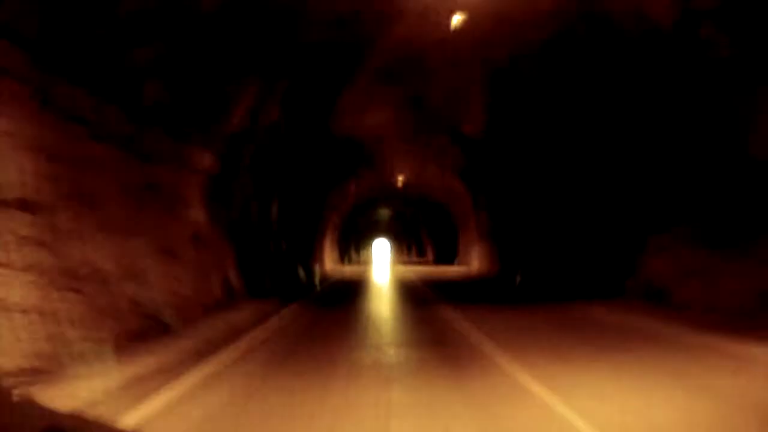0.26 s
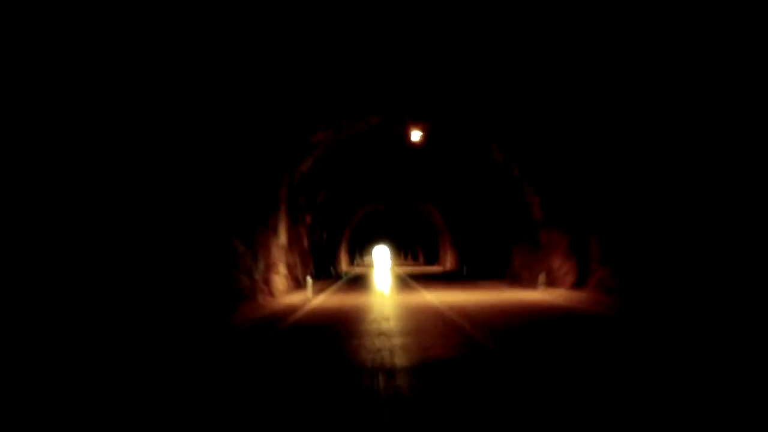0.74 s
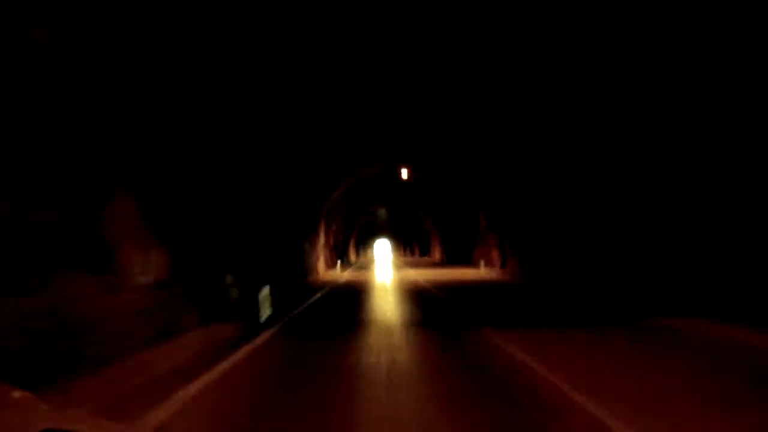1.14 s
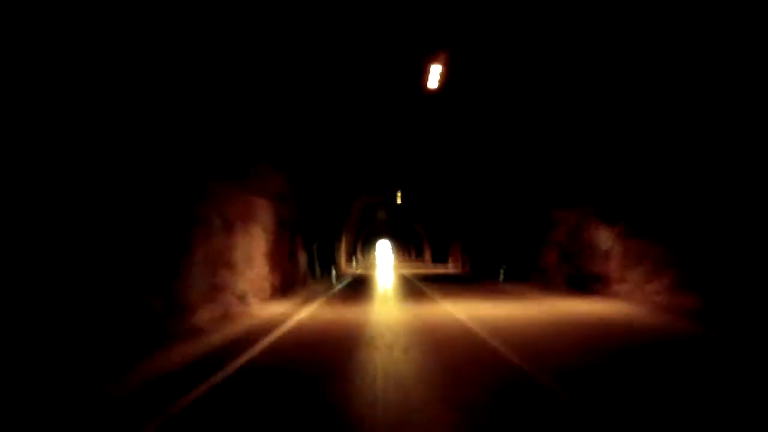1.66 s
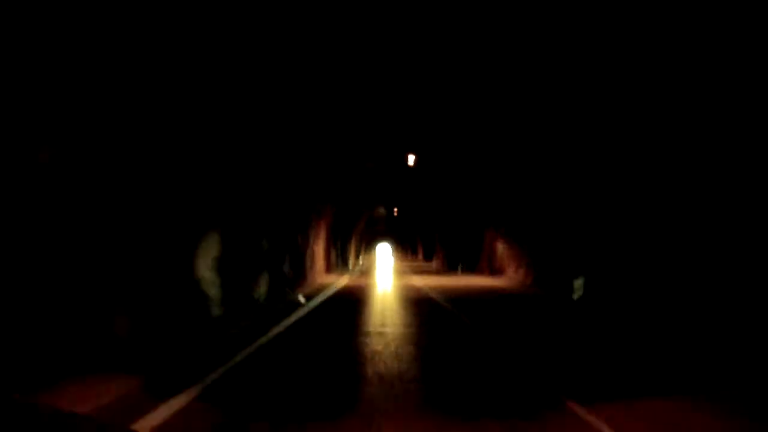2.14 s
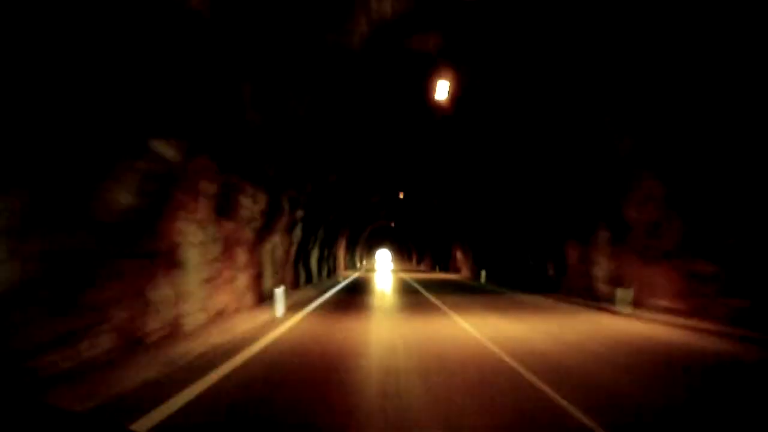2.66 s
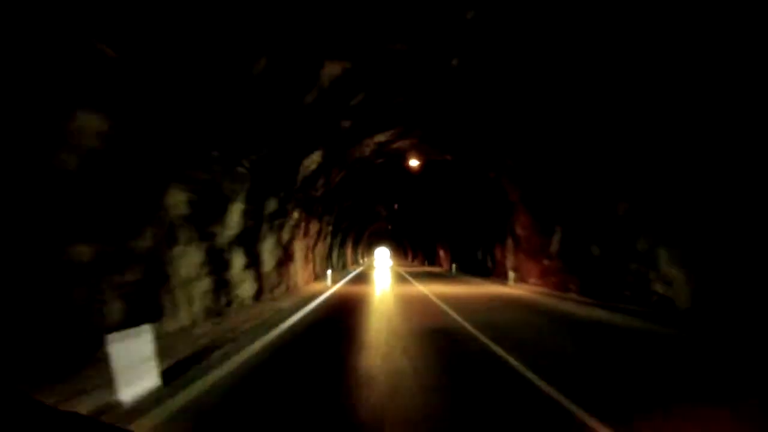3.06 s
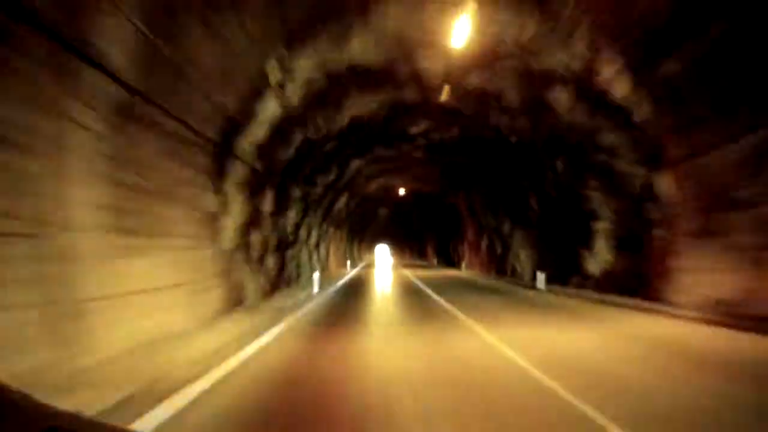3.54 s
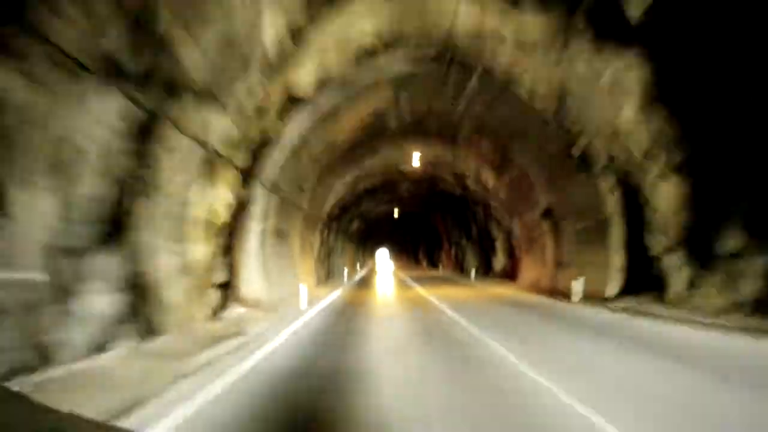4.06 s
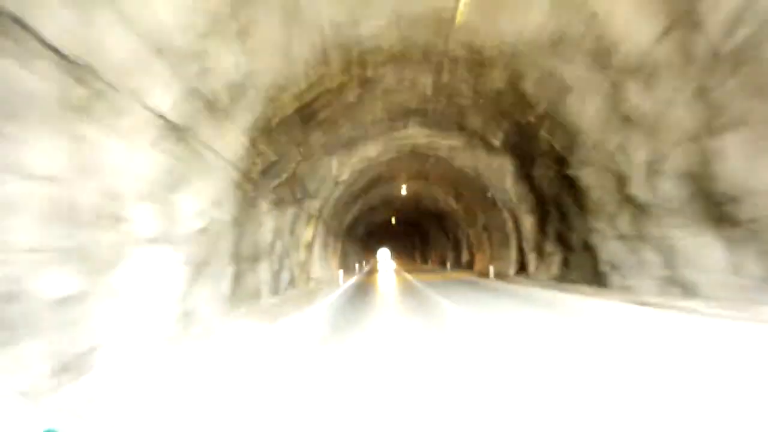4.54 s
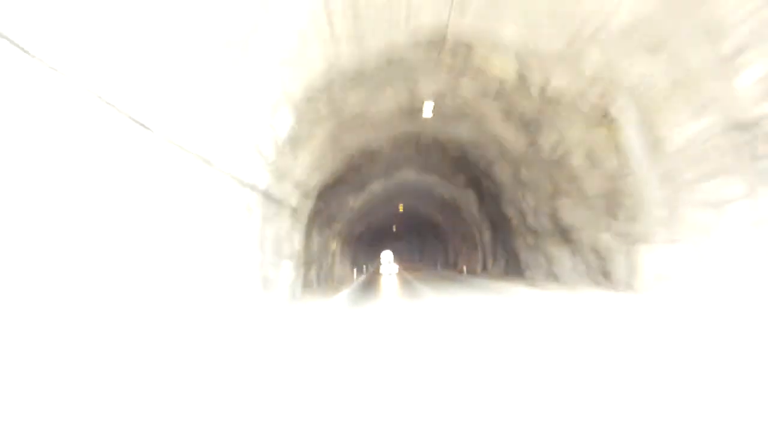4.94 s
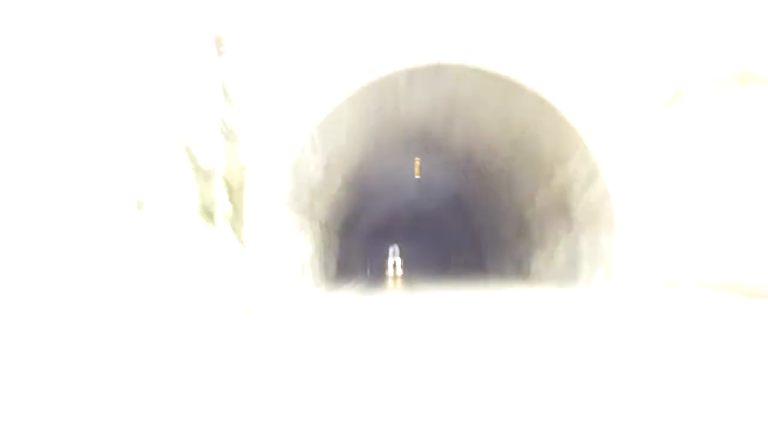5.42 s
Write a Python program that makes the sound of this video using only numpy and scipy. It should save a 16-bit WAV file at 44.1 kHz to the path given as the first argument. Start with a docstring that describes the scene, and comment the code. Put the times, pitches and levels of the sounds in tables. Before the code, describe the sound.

Steady engine hum and rough tyre noise in a tunnel drive, chirping camera mount, thumping jolts, engine pitch sagging before clattering at the end.

```python
"""An engine drones as a car drives through a rock tunnel: a firing tone, its half order and weak overtones,
with the pitch easing down near the exit. A small camera at the windscreen hears it under shaped-noise road rumble,
boom and tyre roar, with one swell of hiss; its mount squeaks in stick-slip chirps and rattles as ringing modes.
Bumps push the microphone and duck its limiter; a sample-and-hold adds a gritty treble."""
import sys
import numpy as np
from scipy import signal
from scipy.fft import rfft, irfft
from scipy.io import wavfile

SR = 44100
rng = np.random.default_rng(int(sys.argv[2]) if len(sys.argv) > 2 else 0)


def dump(signal):
    """Clip the signal to [-1, 1] and save it as 16-bit WAV at the path in sys.argv[1]."""
    limited = np.clip(np.atleast_2d(signal).T, -1, 1)
    pcm = np.round(limited * 32767).astype(np.int16)
    wavfile.write(sys.argv[1], SR, pcm)


N = 250929
TIME_S = np.arange(N) / SR

# Road roughness heard in the cabin: (time [s], boom before trim [dB], tyre roar before trim [dB])
ROAD_LEVELS = [(0, -25, -40.5), (0.4, -27, -34), (0.52, -29, -43.5), (0.8, -27.5, -37),
               (1.12, -24.5, -37.5), (1.24, -29, -41.5), (1.8, -20.5, -35.5), (2.4, -25, -39),
               (2.64, -31.5, -45.5), (2.8, -23.5, -36.5), (3.17, -28.5, -42), (3.7, -26.5, -38.5),
               (4.1, -27.5, -41), (4.25, -30, -42), (4.9, -23.5, -38.5), (5.25, -28, -43.5),
               (5.5, -26.5, -39), (5.69, -28.5, -41)]
# Body rumble before bobbing and lumps: (time [s], level [dB])
RUMBLE_LEVELS = [(0, -22.5), (0.7, -17.5), (1.7, -18.5), (2.4, -17), (2.68, -23.5), (3.1, -18),
                 (4.0, -20.5), (4.75, -16.5), (5.15, -23), (5.69, -23)]
# Noise spectra, rescaled to rms 1: (frequency [Hz], relative density [dB per Hz])
RUMBLE_SPECTRUM = [(10, -39), (22, -10.5), (44, 2.5), (58, 2), (80, 1.5), (110, -1.5), (150, -2),
                   (200, -13.5), (320, -43)]
BOOM_SPECTRUM = [(90, -30), (160, 0), (240, -0.5), (320, -5), (480, -6.5), (600, -10.5), (720, -15),
                 (860, -26.5), (1300, -66)]
ROAR_SPECTRUM = [(400, 0.5), (800, 2), (1020, 5), (1250, 4.5), (1450, 1.5), (1750, 3), (2200, 4.5),
                 (2600, 0), (2900, 6), (3250, -1.5), (4200, -9.5), (4700, -9), (5300, -14.5), (6000, -18)]
HISS_SPECTRUM = [(2500, -20), (3800, -3), (4600, 3), (5400, -9), (6000, -12)]
# Tyre hiss as the rock opens to daylight: (centre time [s], Gaussian half-width to 1/e [s], peak level [dB])
HISS_SWELL = (4.68, 0.11, -48)
# Road bumps: (nominal time [s], jolt [dB], pressure dip before it [dB])
BUMPS = [(0.435, -1.5, -9), (0.929, 7, -10), (1.137, 2, -2), (1.204, -4, 2.5), (1.808, -1, -23),
         (1.997, 2.5, -8.5), (2.148, -0.5, -15), (2.328, 0, -25), (2.522, -5, -8.5), (2.834, 15, -5.5),
         (3.395, 7, 2), (3.789, 8.5, -6), (4.104, 0, -16), (4.937, 14.5, -3), (5.239, 8, 5.5)]
# Mount rocking: (nominal time [s], forward squeak [dB], return squeak before trim [dB])
MOUNT_ROCKS = [(0.1485, -19.5, -24), (0.25, -20, -29), (0.317, -22, -35), (0.3616, -12.5, -19.5),
               (0.706, -20, -42), (0.896, -24.5, -37), (0.9985, -24.5, -45), (1.1218, -18, -28),
               (1.43, -18, -32), (1.644, -22, -37), (1.7436, -16.5, -32), (2.137, -14, -28),
               (2.188, -20, -22), (2.444, -20.5, -33), (2.692, -20, -28.5), (3.0496, -30, -52),
               (3.454, -18, -31), (3.4999, -16, -34), (3.551, -21, -32), (3.9173, -24, -32.5),
               (3.9742, -17.5, -28.5), (4.023, -17, -36), (4.0764, -25, -36), (4.4913, -23.5, -52),
               (4.793, -27.5, -41), (4.8824, -14.5, -32), (5.083, -26.5, -48), (5.3765, -15.5, -36),
               (5.46, -19, -34), (5.508, -15, -37)]
# Mount slipping back on its own: (nominal time [s], squeak before trim [dB])
BACK_SLIPS = [(0.6394, -22.5), (0.7767, -27.5), (1.0537, -30), (1.183, -29.5), (1.713, -25.5),
              (2.1066, -29.5), (2.3527, -25), (2.5217, -25.5), (3.3228, -33.5), (3.4244, -29),
              (4.1616, -34.5), (4.6364, -28), (5.315, -26.5), (5.4365, -27)]
# Mount knocks, and at 0.9244 s the crackle of a bump overloading the microphone input:
# (nominal time [s], clack peak [dB], thud before trim [dB re clack], snap before trim [dB re clack])
RATTLES = [(0.3877, -15, -2, -19), (0.409, -16, 5.5, -24), (0.9244, -22, 7.5, -7), (1.119, -16, 4.5, -29),
           (1.132, -22.5, 16, -25), (3.5234, -18, -3, -22), (3.9996, -17, -4, -24), (4.0483, -17, -1, -11),
           (4.3991, -21, 8, -5), (4.8143, -18, 1, -18), (4.9089, -14.5, 4, -27), (5.402, -12.5, -3, -31),
           (5.435, -11.5, -17, -25), (5.4575, -18, -11, -20), (5.463, -16.5, 0, -1.5),
           (5.482, -2.5, 2.5, -11), (5.5071, -9.5, 0, -10), (5.5307, -13, 0, -28), (5.5371, -17, 1, -27),
           (5.6332, -13.5, -3, -33), (5.6388, -19, 5.5, -28)]
# Modes of the mount's plastic: (frequency [Hz], level [dB], t60 [s])
PLASTIC_MODES = [(967, 7.5, 0.034), (1144, 5.5, 0.021), (1736, 7, 0.014), (2180, 7.5, 0.012),
                 (2476, 4, 0.029), (3016, 10, 0.0071), (3870, 0.5, 0.024), (4820, -8.5, 0.01)]
# Modes of its hollow body: (frequency [Hz], level [dB], t60 [s])
BODY_MODES = [(450, -8, 0.024), (648, 4, 0.0062), (744, -3, 0.016)]
# Engine, before jitter and waver: (time [s], firing rate [Hz], firing tone [dB], half order before trim [dB])
ENGINE = [(0, 126.8, -23.5, -22.5), (.4, 126.1, -20, -22), (1.15, 124.3, -30, -23.5),
          (1.6, 121.5, -23.5, -30.5), (2.85, 123, -22, -20.5), (3.3, 123, -28, -21),
          (3.9, 122.1, -19.5, -27), (4.3, 118, -21, -28), (5.15, 108.7, -19.5, -31.5),
          (5.69, 103.3, -16.5, -15)]
# Engine overtones: (multiple of firing rate [-], level [dB re firing tone])
OVERTONES = [(1.5, -29), (2, -14), (3, -24.5), (4, -26.5)]

# The car bobs on its springs
BOB_HZ, BOB_CREST_S = 4.4, 0.22
# Return slip: delay after the forward slip, mean pitch, rms pitch spread as a fraction
RETURN_DELAY_S, RETURN_HZ, RETURN_SPREAD = 0.0235, 3690, 0.028
HOLD_HZ, EDGE_HZ = 12000, 15500  # sample-and-hold rate, final low-pass


def amp(db):
    """Decibels to gain."""
    return 10 ** (np.asarray(db) / 20)


def unit(x):
    """Scale to rms 1."""
    return x / np.sqrt(np.mean(x ** 2) + 1e-20)


def curves(rows):
    """Each column after time as a curve over TIME_S."""
    time_s, *columns = np.transpose(rows)
    return [np.interp(TIME_S, time_s, column) for column in columns]


def add(mix, start_s, sound):
    """Add a sound into the mix in place, cut at the end."""
    part = mix[max(round(start_s * SR), 0):][:len(sound)]
    part += sound[:len(part)]


def noise(spectrum):
    """Noise of rms 1 with the given spectrum, rolled off above its last point."""
    f_hz = np.fft.rfftfreq(N, 1 / SR) + 1  # +1 avoids log(0)
    hz, db = np.transpose(spectrum)
    rolloff = np.maximum(f_hz / hz[-1], 1) ** 2
    shape = amp(np.interp(np.log(f_hz), np.log(hz), db)) / rolloff
    return unit(irfft(rfft(rng.standard_normal(N)) * shape, N))


def wander(rate_hz):
    """Slow random curve of rms 1, Gaussian-filtered to about the given rate."""
    f_hz = np.fft.rfftfreq(N, 1 / SR)
    return unit(irfft(rfft(rng.standard_normal(N)) * np.exp(-(f_hz / rate_hz) ** 2), N))


def lowpass(x, cutoff_hz):
    """Steep linear-phase low-pass."""
    return signal.oaconvolve(x, signal.firwin(301, cutoff_hz, fs=SR), "same")


def ring(modes):
    """Response of damped modes to one contact, alternate modes inverted."""
    t_s = np.arange(SR // 20) / SR
    response = np.zeros(len(t_s))
    for k, (hz, db, t60_s) in enumerate(modes):
        response += amp(db - 60 * t_s / t60_s) * np.sin(2 * np.pi * (hz * t_s + k / 2))
    return response


def squeak(hz, length_s, sag, rough_rad, scratch, octave_db=-21):
    """One stick-slip chirp: sharp swell, sagging pitch, phase random walk, faint octave and scrape noise."""
    u = np.linspace(0, 1, max(int(length_s * SR), 10))
    steps, scrape = rng.standard_normal((2, SR // 20))[:, :len(u)]
    angle = 2 * np.pi * np.cumsum(hz * (1 + sag * (.5 - u))) / SR
    angle += rough_rad * np.cumsum(steps) / np.sqrt(len(u))
    swell = np.sin(np.pi * u) * np.exp(-2 * abs(u - .5))
    edge = amp(octave_db) * np.sin(2 * angle) + scratch * scrape
    return swell * (np.sin(angle) + swell * edge)  # edge peaks more sharply than the tone


def hiss():
    """Tyre hiss swells smoothly as the rock opens."""
    centre_s, width_s, db = HISS_SWELL
    return amp(db) * np.exp(-((TIME_S - centre_s) / width_s) ** 2) * noise(HISS_SPECTRUM)


def road(shake_hz=37, shake_jitter=0.0915, shake_db=1.62, rumble_bob_db=0.5, boom_bob_db=0.6,
         lumps_db=1.5, boom_flutter_db=3.0, roar_flutter_db=1.47, boom_trim_db=-0.42, roar_trim_db=2.5):
    """Asphalt drives the body: rumble and boom bob, boom and roar share a flutter, shaking pulses the roar."""
    boom_db, roar_db = curves(ROAD_LEVELS)
    bob = np.cos(2 * np.pi * BOB_HZ * (TIME_S - BOB_CREST_S))
    flutter = wander(60)
    shake = np.sin(2 * np.pi * np.cumsum(shake_hz * (1 + shake_jitter * wander(13.0))) / SR)
    rumble_db = curves(RUMBLE_LEVELS)[0] + rumble_bob_db * bob + lumps_db * wander(7.9)
    boom_db = boom_db + boom_trim_db + boom_bob_db * bob + boom_flutter_db * flutter
    roar_db = roar_db + roar_trim_db + roar_flutter_db * flutter + shake_db * shake
    rumble = amp(rumble_db) * noise(RUMBLE_SPECTRUM)
    boom = amp(boom_db) * noise(BOOM_SPECTRUM)
    roar = amp(roar_db) * noise(ROAR_SPECTRUM)
    return rumble + boom + roar


def bumps(rise_s=.0007, settle_s=.0015, dip_width_s=.002, dip_lead_s=.004, delay_s=.002):
    """A jolt at the microphone: short pressure dip, then one push that settles smoothly."""
    out = np.zeros(N)
    for bump_s, jolt_db, dip_db in BUMPS:
        t_s = TIME_S - bump_s - delay_s
        # 2.01 brings the push's peak near 1
        out += amp(jolt_db) * 2.01 * np.exp(-np.logaddexp(-t_s / rise_s, t_s / settle_s))
        out -= amp(dip_db) * np.exp(-((t_s + dip_lead_s) / dip_width_s) ** 2)
    return out


def jiggle(per_s=12, level_db=-37, spread_db=3, back_hz=3650, forward_share=.25, forward_hz=2890, follows=0.96):
    """Faint, scratchy mount slips at random times, mostly backward, louder where the road is rough."""
    out, roar_db = np.zeros(N), curves(ROAD_LEVELS)[1]
    shaken_db = level_db + follows * (roar_db - roar_db.mean())
    for when, size, pitch, way in rng.random((int(per_s * N / SR), 4)):
        if way < forward_share:
            chirp = squeak(forward_hz, length_s=0.016, sag=.03, rough_rad=1.6, scratch=0.06)
        else:
            hz = back_hz * (.92 + .16 * pitch)
            chirp = squeak(hz, length_s=0.015, sag=0.033, rough_rad=5.1, scratch=0.089)
        db = shaken_db[int(when * N)] + spread_db * (2 * size - 0.5)
        add(out, when * N / SR, amp(db) * chirp)
    return out


def squeaks(forward_hz=2890, lead_s=0.0023, stutter_db=-7, stutter_delay_s=0.0084, back_db=3):
    """Stick-slip: the mount chirps slipping forward, then stutters higher and rougher slipping back."""
    out = np.zeros(N)
    for rock_s, db, _ in MOUNT_ROCKS:
        length_s = 0.0115 * rng.uniform(.8, 1.2)
        chirp = squeak(forward_hz, length_s, sag=0.031, rough_rad=1.4, scratch=0.055)
        add(out, rock_s - lead_s, amp(db) * chirp)
    # returns come half a swing after the forward slips
    returns = [(rock_s + RETURN_DELAY_S, db) for rock_s, _, db in MOUNT_ROCKS]
    for slip_s, db in returns + list(BACK_SLIPS):
        hz = RETURN_HZ * (1 + RETURN_SPREAD * rng.standard_normal())
        chirp = squeak(hz, length_s=0.01, sag=0.043, rough_rad=2.2, scratch=0.14)
        stutter = squeak(hz, length_s=0.0082, sag=0.054, rough_rad=4.9, scratch=0.23)
        add(out, slip_s - lead_s, amp(db + back_db) * chirp)
        add(out, slip_s - lead_s + stutter_delay_s, amp(db + stutter_db) * stutter)
    return out


def rattles(chatter_s=0.003, grit=0.085, thud_trim_db=-3, snap_trim_db=7, snap_decay_s=0.00076, delay_s=0.000932):
    """An impulse and brief chatter ring the plastic and hollow body, under a snap of noise."""
    out, t_s = np.zeros(N), np.arange(SR // 20) / SR
    plastic, body = ring(PLASTIC_MODES), ring(BODY_MODES)
    for event_s, db, thud_db, snap_db in RATTLES:
        chatter = grit * rng.standard_normal(len(t_s)) * np.exp(-t_s / chatter_s)
        force = chatter + (t_s == 0)  # contact impulse
        clack = signal.fftconvolve(force, plastic)
        thud = signal.fftconvolve(force, body)
        snap = lowpass(rng.standard_normal(len(t_s)), 5300) * np.exp(-t_s / snap_decay_s)
        parts = (clack, 0), (thud, thud_db + thud_trim_db), (snap, snap_db + snap_trim_db)
        for sound, part_db in parts:
            add(out, event_s + delay_s, amp(db + part_db) * sound / abs(sound).max())
    return out


def engine(jitter=0.01365, waver_db=3, smear_rad=0.68, half_order_trim_db=-1.0):
    """Firing tone, half order an octave below and overtones, each wavering in level and phase in the cabin."""
    firing_hz, firing_db, half_db = curves(ENGINE)
    angle = 2 * np.pi * np.cumsum(firing_hz * (1 + jitter * wander(9.66))) / SR
    orders = [(.5, half_db + half_order_trim_db), (1, firing_db)]
    orders += [(multiple, firing_db + db) for multiple, db in OVERTONES]
    out = np.zeros(N)
    for multiple, db in orders:
        level = amp(db + waver_db * wander(4.7))
        out += level * np.sin(multiple * angle + smear_rad * wander(9.9))
    return out


def scene():
    """All sources sum at one microphone, on two equal channels."""
    cabin = hiss() + road() + bumps() + jiggle() + squeaks() + rattles() + engine()
    return np.array([cabin, cabin])


def limiter(x, ceiling_db=-4.0, recovery_db_per_s=105, attack_s=0.00033):
    """Peaks over the ceiling pull the gain down fast; it recovers at a constant dB rate."""
    fall_db = recovery_db_per_s * TIME_S
    over_db = np.maximum(20 * np.log10(abs(x) + 1e-9) - ceiling_db, 0)
    held_db = np.maximum.accumulate(over_db + fall_db) - fall_db
    r = np.exp(-1 / (attack_s * SR))
    reduction_db = signal.lfilter([1 - r], [1, -r], held_db)
    return x * amp(-reduction_db)


def record(dry, low_cut_hz=6):
    """Mono camera input: limiter, low cut, clip, then a sample-and-hold mirroring sound into the treble."""
    x = limiter(dry.mean(0))
    x = signal.lfilter(*signal.butter(1, low_cut_hz, "high", fs=SR), x)
    x = lowpass(np.clip(x, -1, 1), HOLD_HZ / 2)
    sampled = x * (1 + 2 * np.cos(2 * np.pi * HOLD_HZ * TIME_S))  # first images only
    hold_response = np.sinc(np.fft.rfftfreq(N, 1 / SR) / HOLD_HZ)
    held = irfft(rfft(sampled) * hold_response, N)
    out = lowpass(held, EDGE_HZ)
    return np.array([out, out])


dry = scene()
out = record(dry)
dump(out)
```